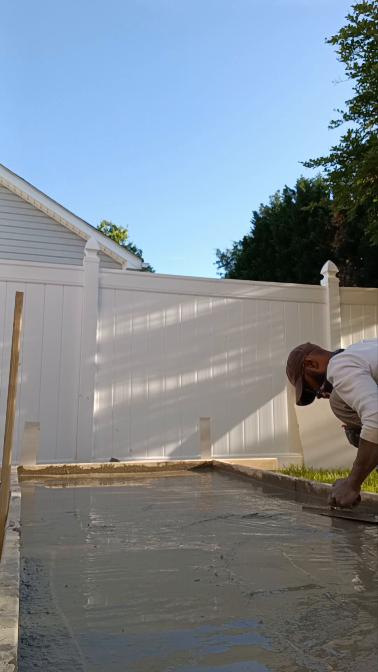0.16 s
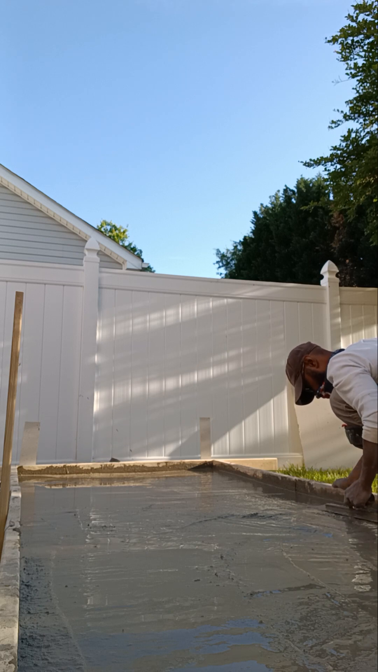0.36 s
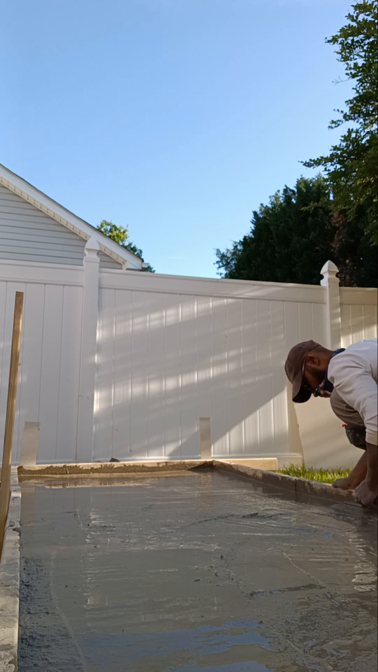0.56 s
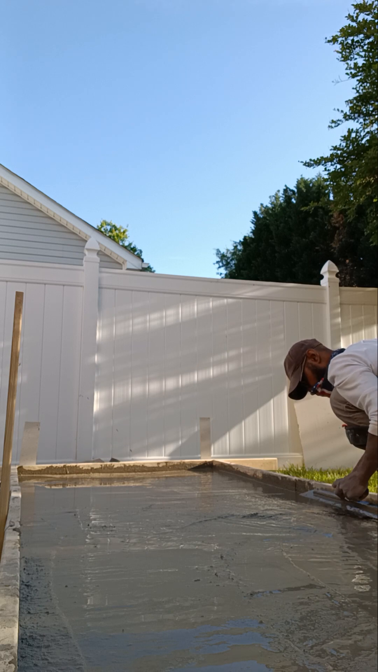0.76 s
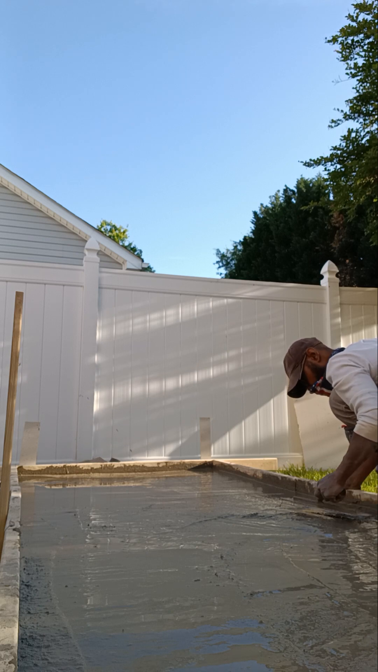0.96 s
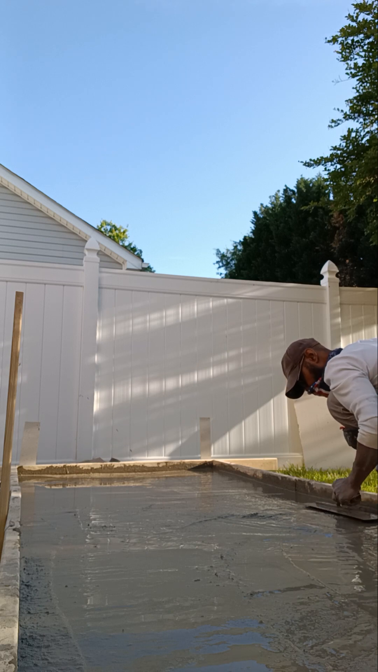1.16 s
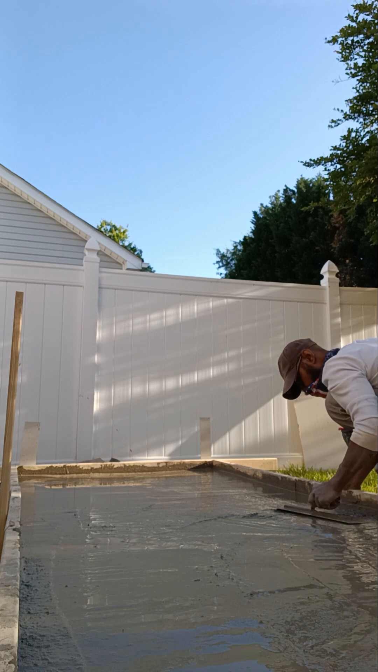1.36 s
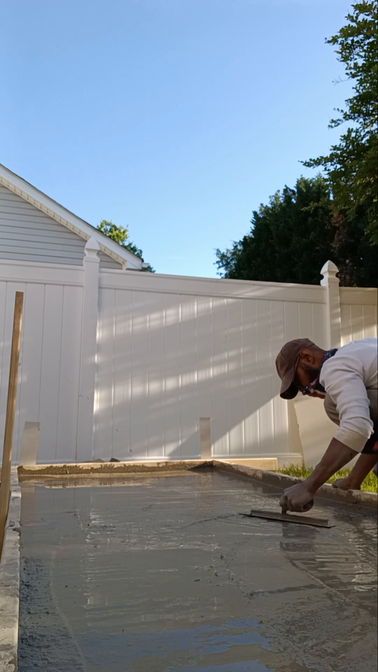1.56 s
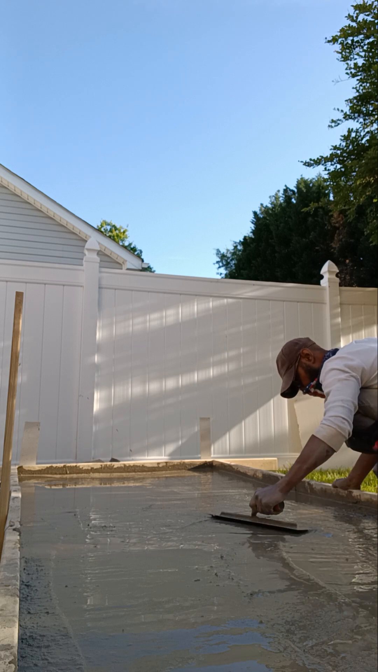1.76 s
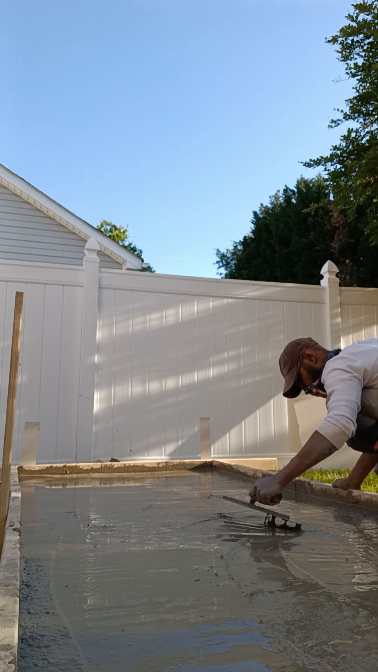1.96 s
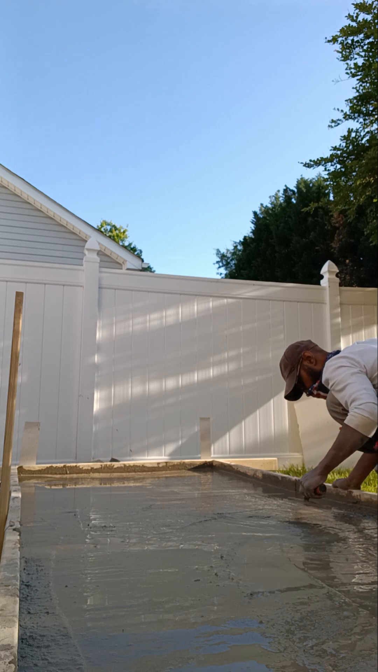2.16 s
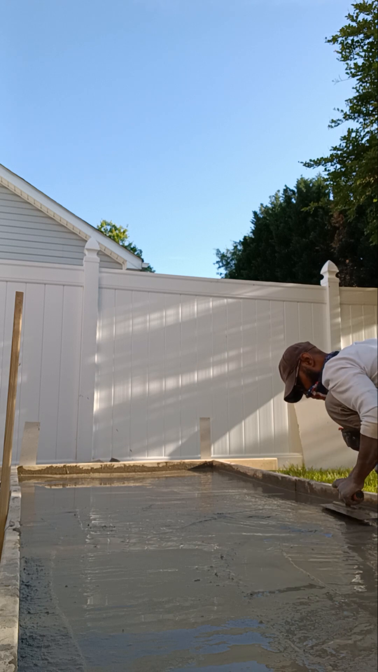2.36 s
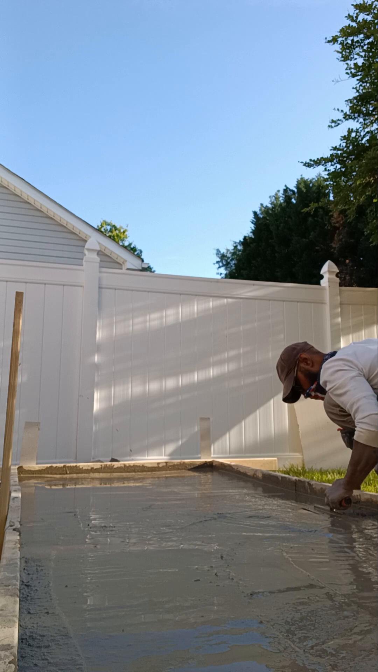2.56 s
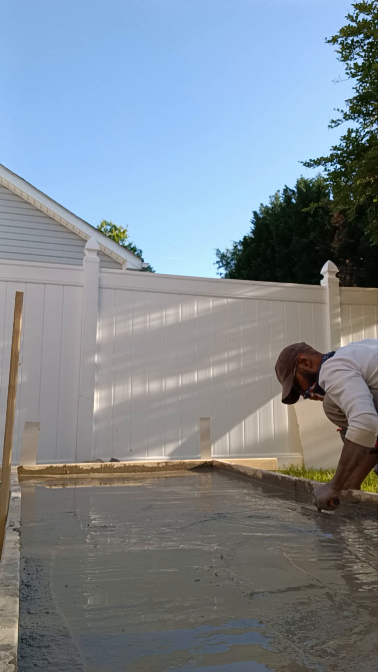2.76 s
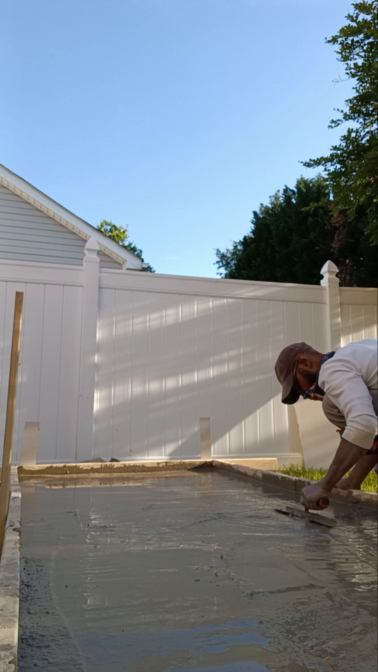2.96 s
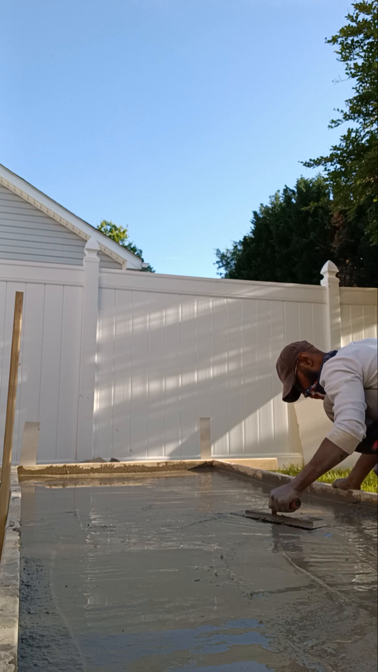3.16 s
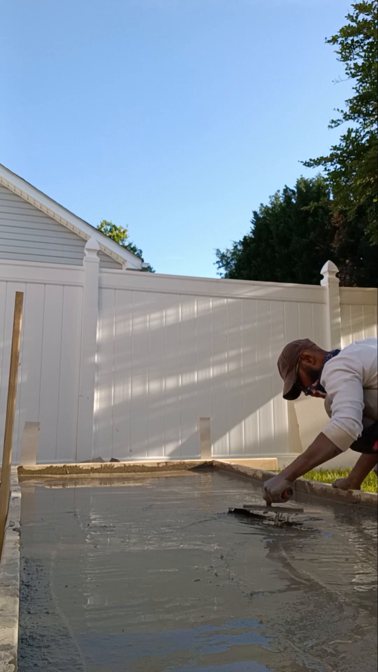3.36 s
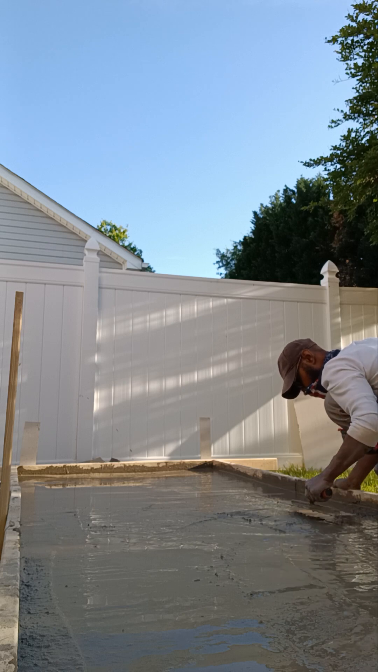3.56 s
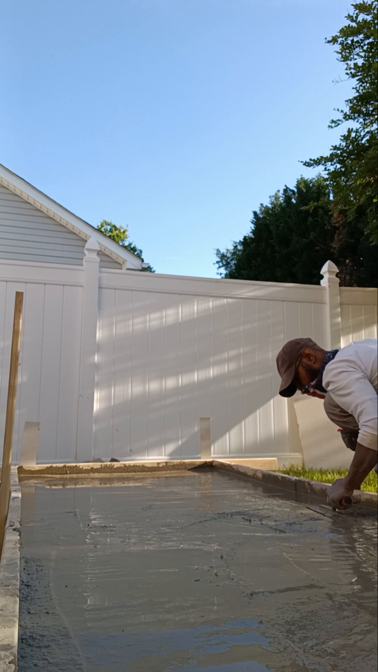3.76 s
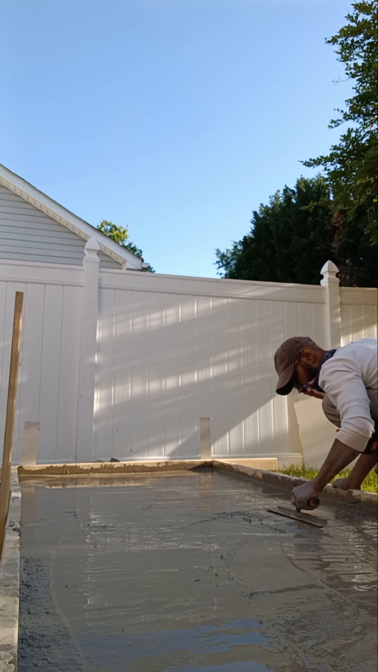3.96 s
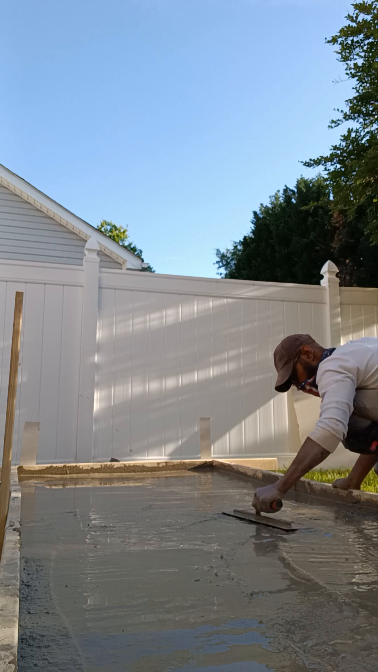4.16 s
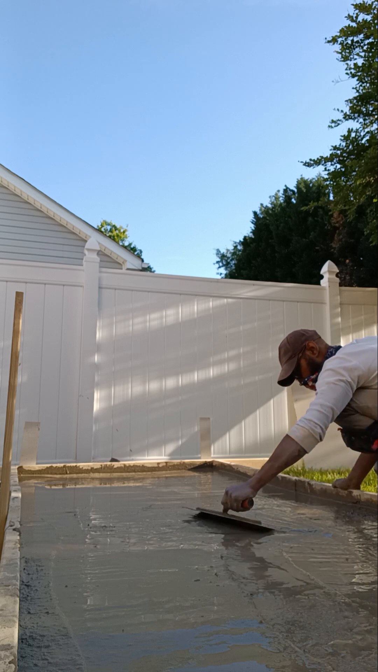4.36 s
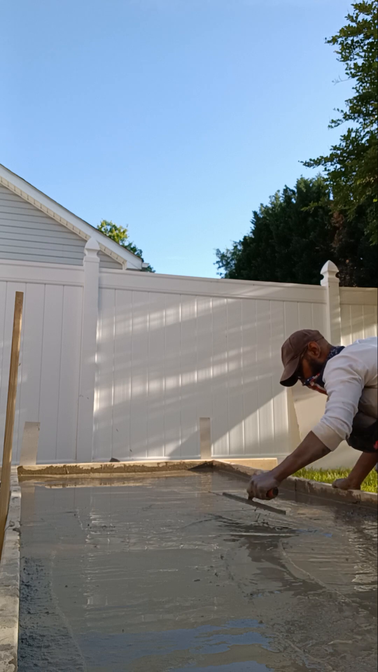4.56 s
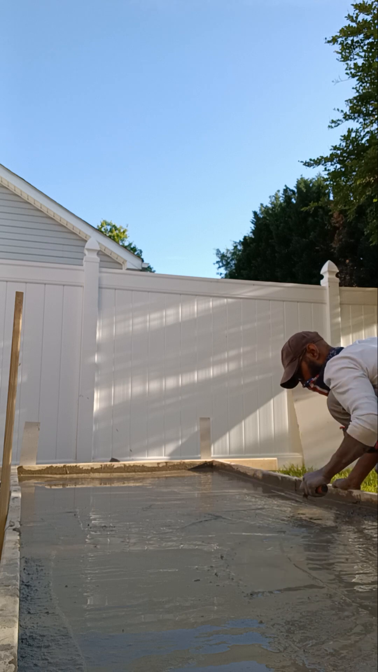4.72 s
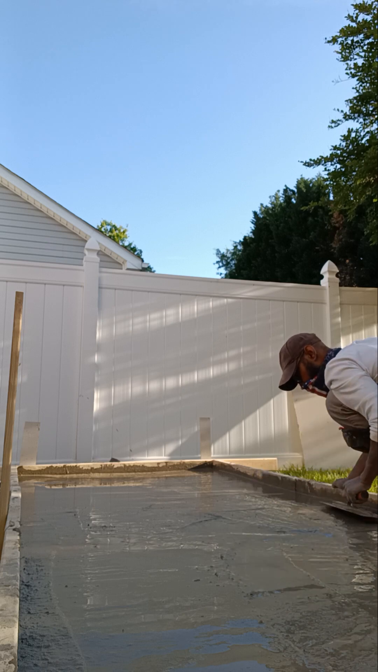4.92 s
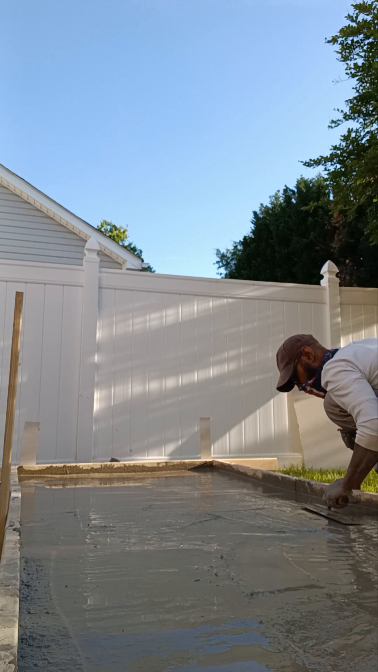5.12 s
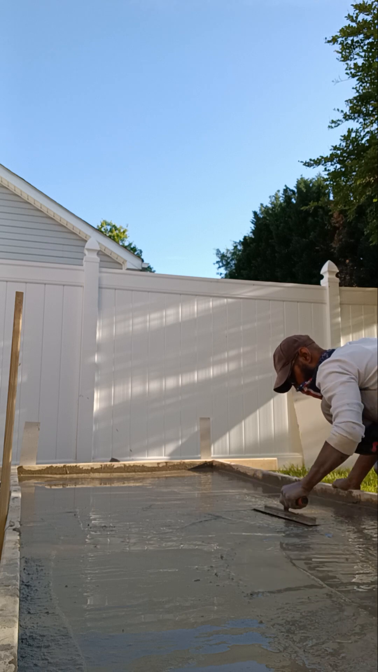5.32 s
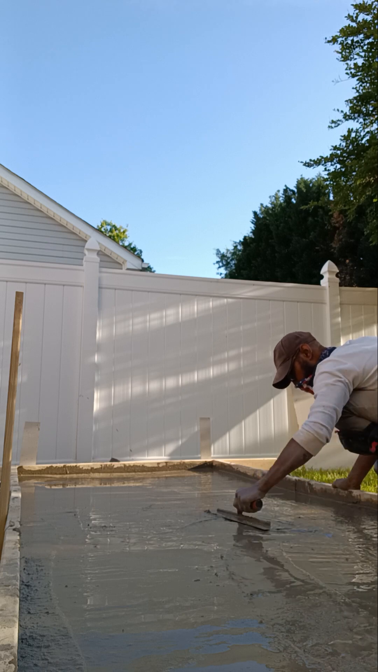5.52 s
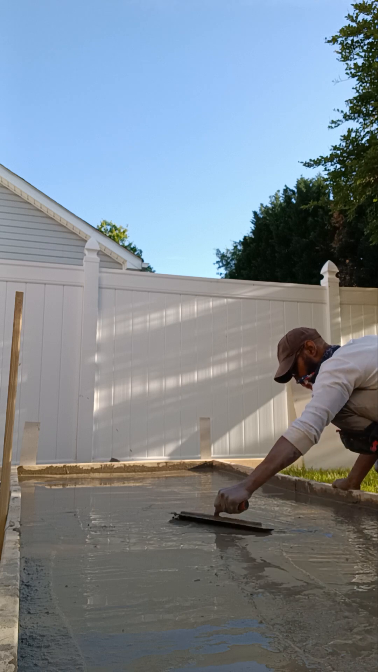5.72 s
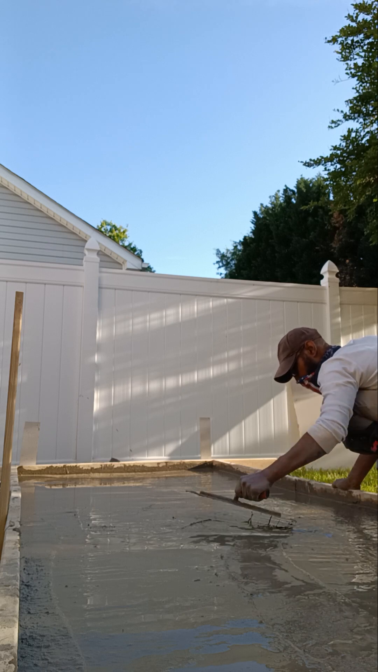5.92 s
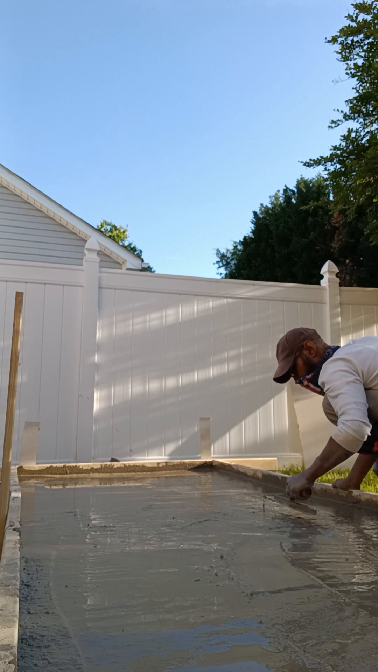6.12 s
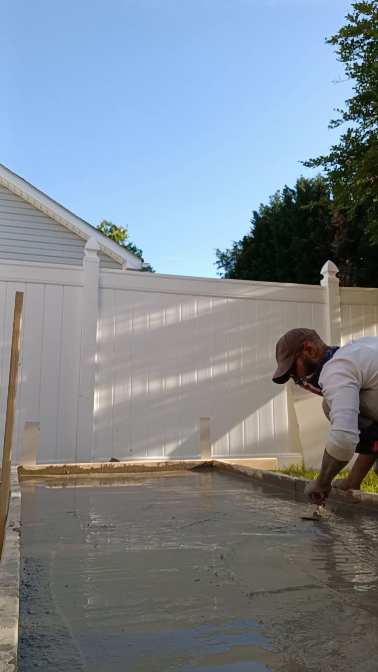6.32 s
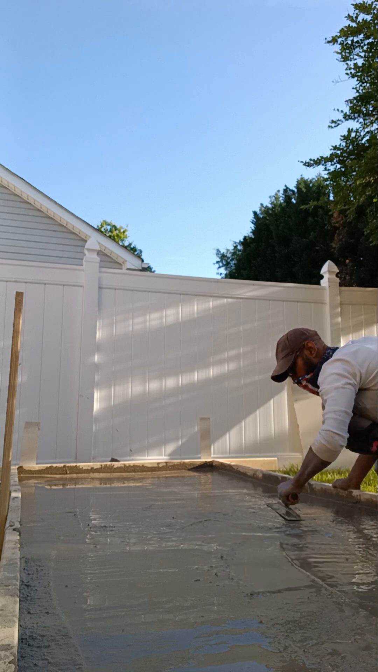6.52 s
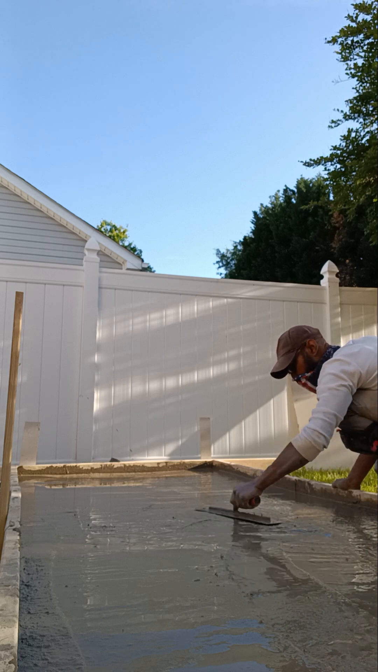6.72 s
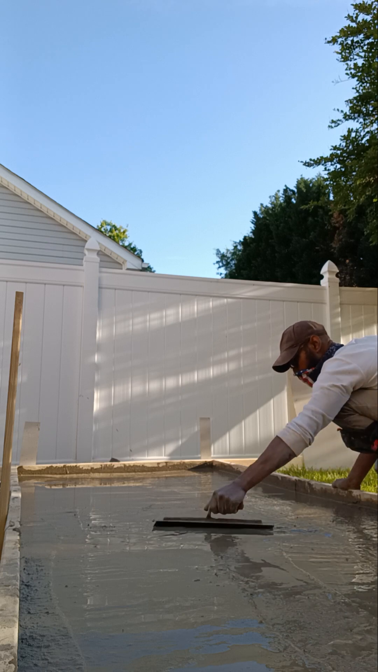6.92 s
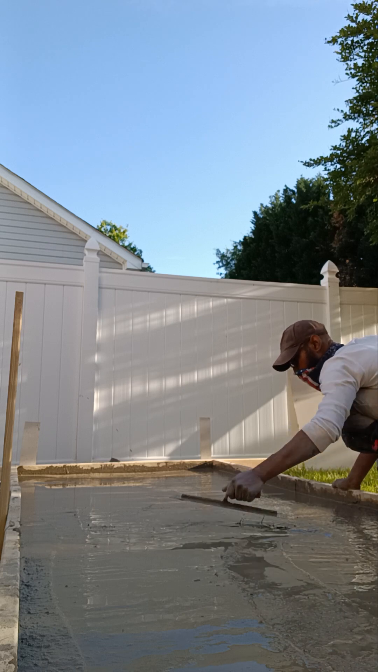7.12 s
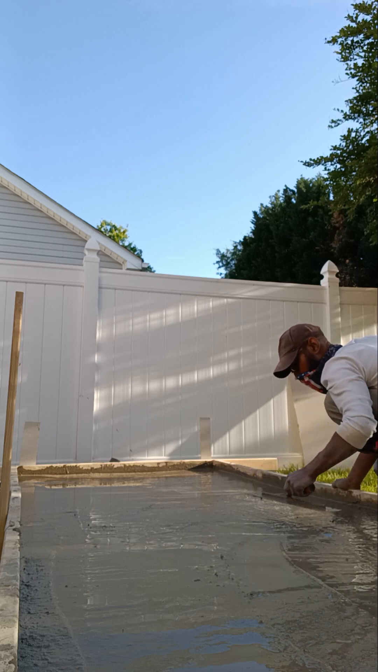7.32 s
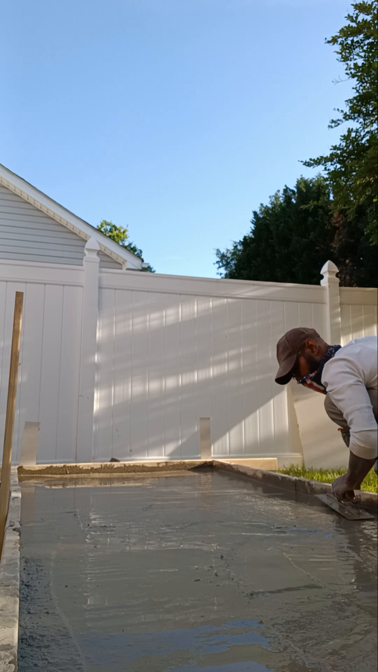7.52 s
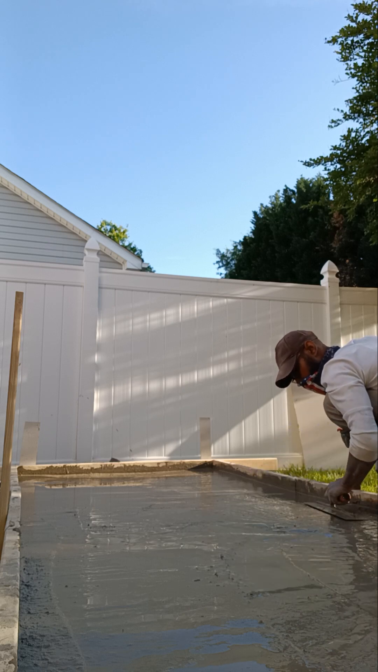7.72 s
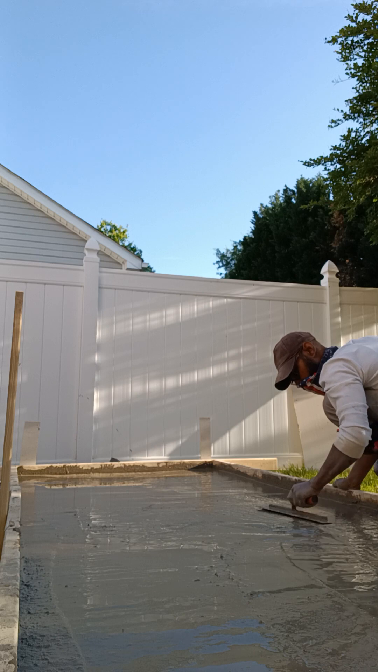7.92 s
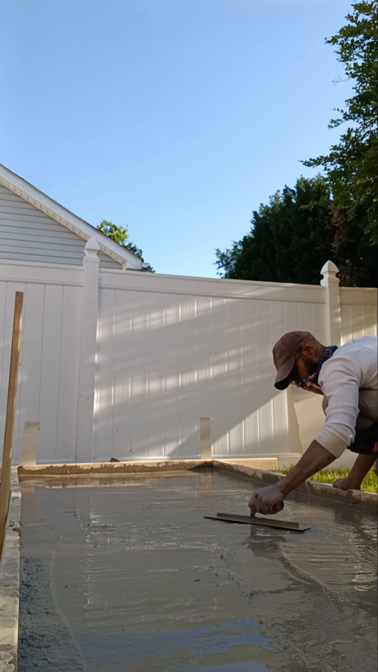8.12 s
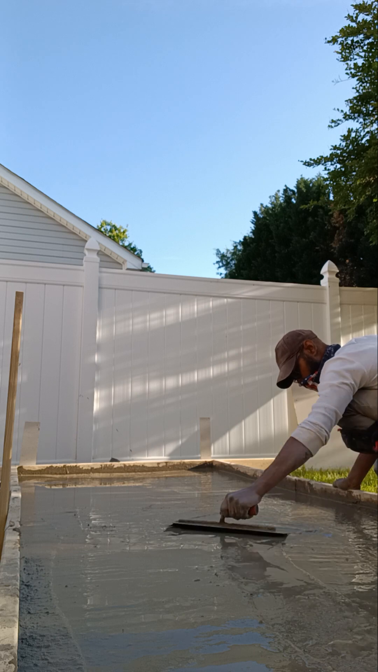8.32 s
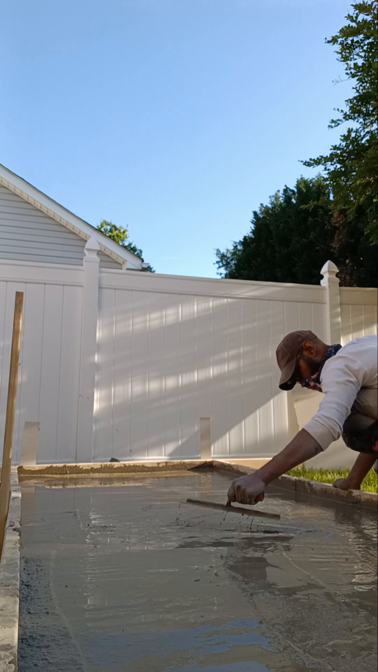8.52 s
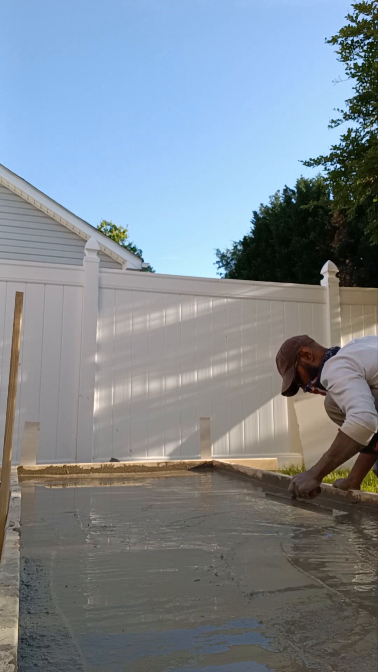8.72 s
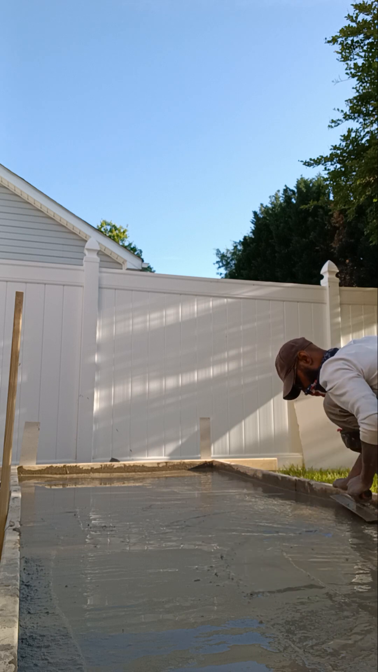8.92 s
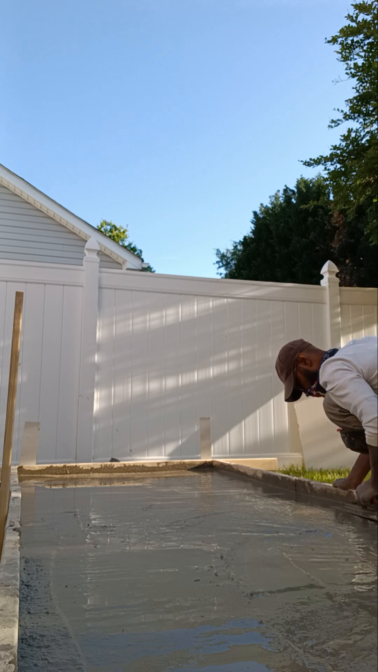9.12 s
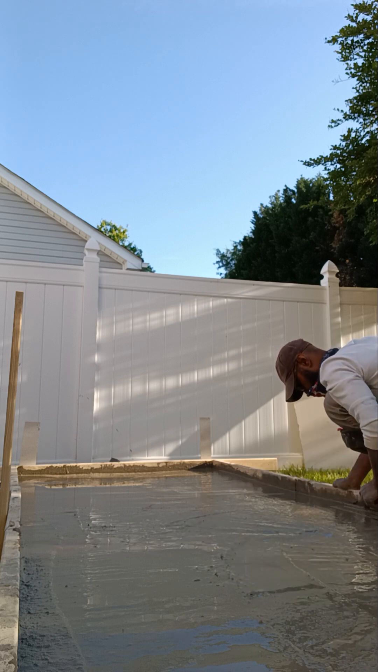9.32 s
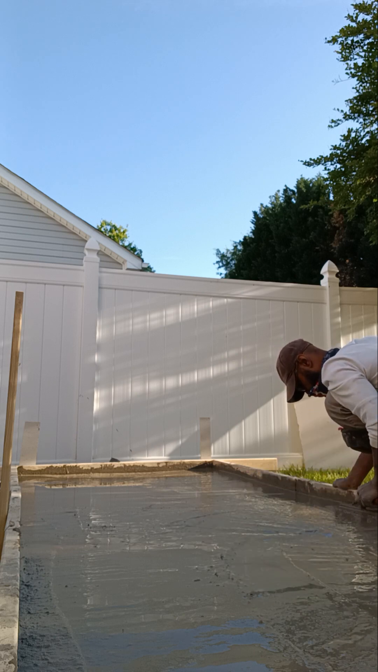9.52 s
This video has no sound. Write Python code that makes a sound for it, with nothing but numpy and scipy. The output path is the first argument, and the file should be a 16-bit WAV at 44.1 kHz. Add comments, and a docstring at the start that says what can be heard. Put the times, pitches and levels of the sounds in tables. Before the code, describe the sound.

Close outdoor sound of a steel trowel sweeping wet concrete in a backyard. Eight gritty, hissing strokes come a little over a second apart, each ending abruptly with a faintly metallic lift. Some stronger strokes crunch over pebbles, and one has a wet squelch. A wooden form is knocked near the start and near the end. Far-off bird whistles and a low, quiet rumble sit behind, with a short fence echo.

```python
"""In a fenced backyard, a steel hand trowel is swept in arcs over a wet concrete slab.
In each stroke the blade lands on its edge, flattens, pushes through wet paste and tilts up again before it lifts:
pressure drives the grinding sand as random impacts, and tilt frees the damped resonance of the blade.
Now and then the wooden form is knocked and rings in decaying modes. A bird whistles in gliding tones far off,
over a soft boom and low outdoor noise; fence and house give a short, diffuse echo."""
import sys
import numpy as np
from scipy import signal
from scipy.fft import rfft, irfft, next_fast_len
from scipy.io import wavfile
from scipy.ndimage import uniform_filter1d, map_coordinates

SR = 44100
rng = np.random.default_rng(int(sys.argv[2]) if len(sys.argv) > 2 else 0)


def materialize(psi):
    """Save the field psi as 16-bit PCM at rate SR to the path in sys.argv[1].

    A 1-D psi becomes a single channel; in a 2-D psi each row is a channel.
    """
    bounded = np.clip(np.atleast_2d(psi).T, -1, 1)
    quanta = np.round(bounded * 32767).astype(np.int16)
    wavfile.write(sys.argv[1], SR, quanta)


N = 422478

# Spectrum of fine sand under steel. Each row: frequency in Hz, relative level in dB.
SAND_SPECTRUM = [(2500, -38), (5500, -11), (7000, -3.5), (8400, 2), (10100, 2.5), (11400, -6), (13500, -9),
                 (16000, -14)]
# Spectrum of coarser grains. Each row: frequency in Hz, relative level in dB.
GRIT_SPECTRUM = [(300, -41), (900, -25.5), (1900, -3), (2350, -8.5), (3100, -1.5), (3750, -2), (4300, 1.5),
                 (5500, 2.5), (6500, -2), (8000, -17), (16000, -44)]
EDGE_HZ = 1460  # nominal pitch of the blade on its edge


def amp(db):
    """Decibels to amplitude gain: 20 dB is a factor of ten."""
    return 10 ** (np.asarray(db) / 20)


def unit(x):
    """Normalisation: x scaled to an rms of 1."""
    return x / np.sqrt(np.mean(x ** 2) + 1e-20)


def along(points, hz):
    """Interpolation of (Hz, value) points on a logarithmic frequency axis."""
    f, v = np.transpose(points)
    return np.interp(np.log(hz + 1), np.log(f + 1), v)


def wobble(rate):
    """Slow random modulation: a spline through random knots, rate of them a second."""
    knots = rng.standard_normal(int(N * rate / SR) + 4)
    return map_coordinates(knots, [np.arange(N) * rate / SR])


def filtered(x, response):
    """Linear filtering: the spectrum of x is multiplied by a complex response of frequency."""
    size = next_fast_len(x.shape[-1] + 8192)
    spectrum = rfft(x, size) * response(np.fft.rfftfreq(size, 1 / SR))
    return irfft(spectrum, size)[..., :x.shape[-1]]


def coloured(x, spectrum):
    """Spectral shaping: x is filtered by (Hz, dB) points, then scaled to rms 1."""
    return unit(filtered(x, lambda hz: amp(along(spectrum, hz))))


def add(track, s, sound):
    """Superposition: a sound is summed into a track at time s in seconds."""
    start = max(0, round(s * SR))
    part = track[..., start:start + sound.shape[-1]]
    part += sound[..., :part.shape[-1]]


def stroke(t, pressure, tilt_s, wettest_s, grit_db, ring_db, squelch_db, flat_hz):
    """Contact excitation: pressure drives all layers, tilt frees the ring and shifts its pitch, wetness squelches."""
    normal_db, hiss_db = -29, -3.5  # an ordinary pressure; fine hiss relative to the pressure
    land_db_per_s, lift_db_per_s = 1502, 522  # contact builds up, and breaks off
    cling_db, cling_db_per_s = -21, 190  # paste clings to the lifted blade for a moment
    landing_tilt, flatten_s = 0.69, 0.14  # tilt runs from 0 (flat) to 1 (on its edge)
    flat_damping_db, ring_follows = 13.5, 0.88  # loss of the ring when flat; ring dB per dB of pressure
    wet_span_s, dry_db, squelch_follows = .28, 17, 0.49  # reach of the wet spot; loss far from it; dB per dB

    times, levels = np.transpose(pressure)
    level_db = np.interp(t, times, levels)
    push_db = level_db - normal_db
    since, lifted = t - times[0], np.maximum(t - times[-1], 0)
    landing_db = land_db_per_s * np.minimum(since, 0)
    leaving_db = np.maximum(-lift_db_per_s * lifted, cling_db - cling_db_per_s * lifted)
    contact_db = landing_db + leaving_db

    rising = np.clip((t - tilt_s) / max(times[-1] - tilt_s, .01), 0, 1)
    tilt = np.minimum(landing_tilt * np.exp(-(since / flatten_s) ** 2) + rising, 1)
    ring = normal_db + ring_db + ring_follows * push_db - flat_damping_db * (1 - tilt)
    wet = np.exp(-((t - wettest_s) / wet_span_s) ** 2)
    squelch = squelch_db + squelch_follows * push_db - dry_db * (1 - wet)
    gains = amp(contact_db + np.array([level_db + hiss_db, level_db + grit_db, ring, squelch]))
    return *gains, tilt, flat_hz + (EDGE_HZ - flat_hz) * tilt


def stroke_controls():
    """Amplitude and pitch envelopes: hiss, grit, ring and squelch gains, tilt and ring pitch of all strokes."""
    # Differences between strokes. Each row: start of tilting up in seconds, wettest moment in seconds,
    # offsets of grit and ring in dB, squelch in dB at ordinary pressure, nominal pitch of the flat blade in Hz.
    stroke_rows = [ (0.05, 0.67, -4, -1.5, -51.5, 1952), (1.36, 1.65, -3, 0.5, -45, 1620),
                   (2.78, 2.83, -1.5, -3.5, -35, 1300), (3.95, 4.1, -4, -4, -44, 1750),
                   (5.3, 5.36, -5, -2, -43, 1820), (6.62, 6.59, -5.5, -2.5, -46.5, 1752),
                   (7.86, 8.1, -6, -2, -45, 1850), (9.301, 9.5, -0.5, -3.5, -44, 1400)]
    # Pressure on the blade, one curve per stroke from landing to lift.
    # Each row of a curve: time in seconds, level that drives the scrape in dB.
    pressure_curves = [
        [(0.0, -61), (0.018, -60.5), (0.134, -40), (0.268, -28.5), (0.322, -27.5), (0.376, -29.5),
         (0.442, -28.5), (0.498, -33), (0.5, -39.5)],
        [(1.142, -38), (1.148, -32.5), (1.19, -37.5), (1.236, -27.5), (1.248, -33), (1.506, -33.5),
         (1.546, -26.5), (1.768, -26), (1.785, -31.5)],
        [(2.36, -44.5), (2.364, -35.5), (2.472, -42), (2.516, -38.5), (2.78, -39.5), (3.052, -23),
         (3.062, -26.5), (3.128, -23), (3.175, -33)],
        [(3.66, -43.5), (3.728, -37.5), (3.824, -27.5), (3.882, -28), (3.912, -26.5), (3.998, -29.5),
         (4.21, -16.5), (4.216, -20), (4.305, -28.5)],
        [(4.882, -52), (4.898, -42), (4.928, -31.5), (5.124, -25.5), (5.184, -30.5), (5.414, -24),
         (5.658, -28.5), (5.67, -24), (5.685, -32)],
        [(6.2, -49), (6.278, -36.5), (6.352, -38.5), (6.372, -36.5), (6.526, -28), (6.718, -24.5), (6.822, -27),
         (6.862, -24), (6.89, -29)],
        [(7.495, -55), (7.505, -37), (7.571, -49), (7.611, -29), (7.631, -40.5), (7.729, -31), (8.089, -18.5),
         (8.265, -23.5), (8.31, -31)],
        [(9.16, -68), (9.194, -72), (9.224, -48.5), (9.32, -42.5), (9.338, -57), (9.412, -54.5), (9.48, -40.5),
         (9.56, -47), (9.58, -43)],
    ]
    wander_hz = 100  # scale of the pitch bends from the unsteady hand
    t, controls = np.arange(N) / SR, np.zeros((6, N))
    controls[-1] = EDGE_HZ
    for pressure, row in zip(pressure_curves, stroke_rows):
        near = (t > pressure[0][0] - .05) & (t < pressure[-1][0] + .3)
        controls[:, near] = stroke(t[near], pressure, *row)
    controls[-1] += wander_hz * wobble(14)
    return controls


def grains(rate, size_db, spread_s):
    """Random impacts: stereo impulses whose port delay varies with their spot along the blade."""
    count = int(rate * N / SR)
    draws = rng.standard_normal((count, 3))
    when = rng.integers(0, N, count)
    size = np.sign(draws[:, 0]) * amp(size_db * draws[:, 1])
    delay = np.round(spread_s * SR * draws[:, 2]).astype(int)
    left = np.clip(when + delay, 0, N - 1)
    return np.array([np.bincount(left, size, N), np.bincount(when, size, N)])


def patchy(x, depth_db, size_bins=5, size_frames=12):
    """Time-frequency modulation: narrow bands swell and fade at random, alike in both channels."""
    z = signal.stft(x, nperseg=512)[2]
    field = uniform_filter1d(rng.standard_normal(z.shape[1:]), size_bins, 0)
    field = uniform_filter1d(field, size_frames, 1)
    return signal.istft(z * amp(depth_db * unit(field)), nperseg=512)[1][:, :N]


def squeaks(rate, life_s, size_db):
    """Stick-slip friction: single grains catch under the steel, each a tiny ring at its own pitch."""
    count = int(rate * N / SR)
    draws, t = rng.random((count, 5)), np.arange(SR // 40) / SR
    hz = 2400 * (11000 / 2400) ** draws[:, :1]
    u = t / (life_s * (.5 + draws[:, 1:2]))
    swell = amp(size_db * draws[:, 2:3]) * u * np.exp(-u) * (1 - t / t[-1])
    where = (draws[:, 3:4] * N).astype(int) + np.arange(len(t))
    channels = []
    # the spot along the blade sets the phase between the ports
    for phase in (0, 3 * (draws[:, 4:] - .5)):
        rings = swell * np.sin(2 * np.pi * hz * t + phase)
        channels.append(np.bincount(where.ravel(), rings.ravel(), N)[:N])
    return unit(np.array(channels))


def sand(judder, hiss, grit):
    """Granular friction: fine sand hisses and coarser grains crack and squeak, in shared clumps."""
    clumps = amp(1.1 * judder + 0.92 * wobble(260))
    fine = patchy(grains(rate=22000, size_db=4.2, spread_s=.000018) * clumps, depth_db=2.7)
    coarse = patchy(grains(rate=14000, size_db=4.2, spread_s=.00006) * clumps, depth_db=3.3, size_bins=4)
    squeaking = amp(-9) * squeaks(rate=420, life_s=.002, size_db=20)
    hissing = amp(-0.74) * hiss * coloured(fine, SAND_SPECTRUM)
    cracking = amp(-0.7) * coloured(coarse, GRIT_SPECTRUM)
    return hissing + grit * (cracking + squeaking)


def blade(judder, pitch_hz, width_hz, core_hz, core_db):
    """Driven resonance: grains excite a broad peak and a narrow core that move as the blade tilts off the paste."""
    drive = grains(rate=2500, size_db=4.0, spread_s=.00013) * amp(2 * judder)
    hz, _, z = signal.stft(patchy(drive, depth_db=4.0, size_bins=2), SR, nperseg=512)
    centre = pitch_hz[np.minimum(np.arange(z.shape[-1]) * 256, N - 1)]  # one pitch per frame
    detune = (hz[:, None] ** 2 - centre ** 2) / (hz[:, None] + 1)
    broad = 1 / (1 + (detune / width_hz) ** 2)
    core = amp(core_db) / (1 + (detune / core_hz) ** 2)
    return unit(signal.istft(z * (broad + core), nperseg=512)[1][:, :N])


def paste(judder, squelch, tilt):
    """Cavity popping: pressed cement paste opens wet pockets, larger and deeper under a flat, hard-pressed blade."""
    # Small pockets. Each row: frequency in Hz, relative level in dB.
    small_spectrum = [(150, -27), (330, -31.5), (480, -10), (700, 2), (900, 3), (1200, -12), (2000, -26),
                      (5000, -50.5)]
    # Large pockets. Each row: frequency in Hz, relative level in dB.
    large_spectrum = [(150, -35.5), (280, -10.5), (400, -9.5), (540, 1.5), (700, -1.5), (1000, -16.5),
                      (3000, -58.5)]
    small = grains(rate=700, size_db=6.5, spread_s=.00004) * amp(1.1 * judder)
    large = grains(rate=260, size_db=5.5, spread_s=.00004) * amp(2.7 * judder)
    depth = (squelch / squelch.max()) ** 0.45 * amp(-5.5 - 11 * tilt)
    popping = coloured(patchy(small, depth_db=4.0, size_bins=2), small_spectrum)
    return squelch * (popping + depth * coloured(large, large_spectrum))


def catches():
    """Impact excitation: landing or dragging a pebble gives a gritty burst and jolts the blade into a clang."""
    # Landings and caught pebbles. Each row: start in seconds, relative levels of crunch and clang in dB.
    catch_rows = [(0.4356, -14.5, -21.5), (1.1382, -22, -33), (2.362, -20.5, -40.5), (3.662, -20, -47),
                  (3.8148, -13.5, -39.5), (4.1512, -6.5, -19), (4.1713, -6.5, -23), (4.204, -5, -23),
                  (4.8815, -23.5, -41), (5.2689, -13.5, -42), (6.1759, -40, -52), (6.204, -29, -42.5),
                  (6.2634, -19.5, -29), (6.7094, -11.5, -33), (7.028, -39.5, -65), (7.4898, -28, -47.5),
                  (7.6101, -23.5, -44), (7.8915, -14.5, -41.5), (7.9254, -8.5, -32), (8.063, -5.5, -21.5),
                  (8.0945, -8, -23), (8.4113, -34.5, -57), (9.0261, -31, -54), (9.0393, -23, -52.5),
                  (9.3162, -28.5, -40), (9.3846, -46, -42), (9.468, -27, -44)]
    # Spectrum of the jolted blade. Each row: frequency in Hz, relative level in dB.
    clang_spectrum = [(700, -31.5), (1200, -6.5), (1480, 1), (1800, -4.5), (2600, -20), (6000, -45.5)]
    crunch_t60_s, clang_t60_s = .047, .11
    track, t = np.zeros((2, N)), np.arange(SR // 8) / SR
    for s, crunch_db, clang_db in catch_rows:
        noise = rng.standard_normal(len(t)) + rng.standard_normal((2, len(t)))  # shared part + one per port
        crush = noise * amp(3 * rng.standard_normal(len(t)))
        burst = unit(coloured(crush, SAND_SPECTRUM) + 0.93 * coloured(crush, GRIT_SPECTRUM))
        burst = burst * amp(crunch_db - 7.5 - 60 * t / crunch_t60_s)
        clang = coloured(rng.standard_normal(len(t)), clang_spectrum)
        clang = clang * amp(clang_db - 1 - 60 * t / clang_t60_s)
        add(track, s, (1 - np.exp(-t / 0.00058)) * (burst + clang))
    return track


def knocks():
    """Modal vibration: each blow rings the decaying modes of the board, with a faint noisy crack on top."""
    # Blows on the wooden form. Each row: start in seconds, relative level in dB.
    knock_rows = [(0.4924, -14.5), (7.528, -36.5), (8.87, -12.5), (9.048, -33), (9.229, -46), (9.319, -41)]
    # Modes of the form board. Each row: frequency in Hz, mean relative level in dB, 60 dB decay time in seconds.
    board_modes = [(133.5, -28.5, 0.39), (179, -11, 0.081), (284, -23.5, 0.24), (406, 1, 0.045),
                   (461, 5, 0.023), (770, -13, 0.062), (950, -13, 0.032), (1170, -16, 0.019),
                   (1430, -28, 0.12), (1650, -20, 0.035)]
    # Spectrum of the crack. Each row: frequency in Hz, relative level in dB.
    crack_spectrum = [(500, 2), (2000, -7.5), (3500, -16.5), (9000, -13), (13000, -17.5)]
    track, t = np.zeros(N), np.arange(SR // 3) / SR
    for s, db in knock_rows:
        ring = np.zeros(len(t))
        for hz, level, t60 in board_modes:
            ring += amp(level + rng.normal(0, 1) - 60 * t / t60) * np.sin(2 * np.pi * hz * t)
        crack = amp(-24.0 - 60 * t / 0.1) * coloured(rng.standard_normal(len(t)), crack_spectrum)
        add(track, s, amp(db) * (ring + crack) * (1 - np.exp(-t / 0.0013)))
    return track


def bird():
    """Frequency modulation: slurred, fluttering whistles glide in pitch while they swell and fade."""
    # Whistles. Each row: start in seconds, length in seconds, nominal start and end pitch in Hz, relative level in dB.
    whistle_rows = [(0.598, 0.1, 3110, 3440, -53.5), (0.665, 0.15, 2370, 2560, -58),
                    (1.029, 0.22, 3140, 3430, -56.5), (1.845, 0.089, 3150, 3380, -53.5),
                    (1.894, 0.12, 2380, 2690, -57), (3.252, 0.067, 3250, 2800, -51.5),
                    (3.3, 0.14, 2266, 2170, -52.5), (4.387, 0.069, 3040, 3100, -56.5),
                    (4.435, 0.062, 2420, 1900, -57.5), (4.527, 0.073, 3170, 3230, -55.5),
                    (4.577, 0.067, 2570, 1900, -57.5), (5.77, 0.04, 2840, 2740, -54),
                    (6.166, 0.13, 3020, 3040, -55)]
    arch_hz = 25  # upward bend in the middle of every whistle
    track = np.zeros(N)
    for s, length, start_hz, end_hz, db in whistle_rows:
        u = np.linspace(0, 1, int(length * SR))
        swell = np.sin(np.pi * u)
        pitch = start_hz + (end_hz - start_hz) * u + arch_hz * swell
        flutter = unit(uniform_filter1d(rng.standard_normal(len(u)), size=90))
        pitch = pitch * (1 + .024 * flutter)
        add(track, s, amp(db) * swell * np.sin(2 * np.pi * np.cumsum(pitch) / SR))
    return track * amp(2.7 * wobble(120))


def yard(x):
    """Diffuse reverberation: fence and house answer with decaying noise, different at each port."""
    # Decay of the echo. Each row: frequency in Hz, 60 dB decay time in seconds.
    decay_times = [(150, 0.24), (600, 0.19), (2000, 0.38), (6000, 0.3), (14000, 0.18)]
    hz, t, z = signal.stft(rng.standard_normal((2, SR // 2)), SR, nperseg=256)
    decay = amp(-60 * t / along(decay_times, hz)[:, None])
    tail = signal.istft(z * decay * (1 - np.exp(-t / 0.0061)), SR, nperseg=256)[1]
    return signal.fftconvolve(np.atleast_2d(x), tail / np.linalg.norm(tail[0]), axes=1)[:, :N]


def boom():
    """Additive synthesis: low tones that swell and die sum to a soft, very low boom."""
    # Tones. Each row: start in seconds, frequency in Hz, relative level in dB, swell time in seconds.
    boom_tones = [(3.19, 76, -33.5, 0.028), (3.175, 133, -40.5, 0.031), (3.28, 46, -42, 0.07)]
    track, t = np.zeros(N), np.arange(SR // 2) / SR
    for s, hz, db, swell in boom_tones:
        envelope = t / swell * np.exp(1 - t / swell)
        add(track, s, amp(db) * envelope * np.sin(2 * np.pi * hz * t))
    return track * amp(2.3 * wobble(40))


def outdoors():
    """Filtered noise: a lumpy low rumble, partly coherent between the ports, under a faint drifting hiss."""
    # Slow drift of the rumble. Each row: time in seconds, relative level in dB.
    rumble_drift = [(0, -58.2), (0.7, -60.5), (1.3, -57.2), (2.0, -62.1), (2.7, -65.6), (3.7, -58.3),
                    (4.6, -66.1), (5.7, -69.0), (6.6, -65.9), (7.1, -70.8), (7.7, -57.7), (8.5, -62.8),
                    (9.58, -65.3)]
    # Spectrum of the rumble. Each row: frequency in Hz, relative level in dB.
    rumble_spectrum = [(13, -38), (22, -11.5), (47, -3), (65, 3), (123, -5.5), (152, -11), (193, -17.5),
                       (232, -9.5), (246, -13), (285, -25), (325, -30.5), (359, -31), (381, -43),
                       (400, -35.5), (520, -67), (880, -120)]
    # Spectrum of the hiss. Each row: frequency in Hz, relative level in dB.
    air_spectrum = [(150, -16.5), (300, -5.5), (500, -13), (1300, -15), (2000, -20.5), (4000, -19.5),
                    (8000, -24), (11000, -25), (12500, -40), (16000, -46)]
    level_db = np.interp(np.arange(N) / SR, *np.transpose(rumble_drift))
    noise = rng.standard_normal(N) + 0.49 * rng.standard_normal((2, N))
    rumble = coloured(noise, rumble_spectrum) * amp(level_db + 4.0 + 3.7 * wobble(21))
    air = coloured(patchy(rng.standard_normal((2, N)), depth_db=1.5, size_frames=30), air_spectrum)
    return rumble + amp(-71.5 + 1.7 * wobble(2.6)) * air


def ports(x):
    """Minimum-phase filtering: the two microphone ports have opposite, causal resonances."""
    # Unequal hearing of the slab. Each row: frequency in Hz, left minus right gain in dB.
    port_difference = [(850, 1), (1150, -6.5), (1400, -6.5), (1750, -1.5), (2300, 10), (3600, -0.5),
                       (4500, 1.5), (5600, 2.5), (7200, 8), (8400, 10.5), (9900, -8), (11000, -9.5),
                       (12300, 1.5), (15500, -4)]
    size = 1024
    difference_db = along(port_difference, np.fft.rfftfreq(size, 1 / SR))
    log_gain = np.log(amp(difference_db)) * np.array([[.5], [-.5]])
    # folding the cepstrum onto positive times makes the response causal
    cepstrum = irfft(log_gain)[:, :size // 2]
    cepstrum[:, 1:] *= 2
    return signal.fftconvolve(x, irfft(np.exp(rfft(cepstrum, size))), axes=1)[:, :N]


def scene():
    """Interaural-style delay and reverberant mix: the trowel works to the right, the bird among its echoes."""
    lag_s = .00079  # the left port hears the trowel later than the right
    hiss, grit, ring, squelch, tilt, pitch_hz = stroke_controls()
    judder = wobble(55)  # the blade grips and slips unevenly
    steel = amp(.7) * ring * blade(judder, pitch_hz, width_hz=1050, core_hz=300, core_db=-5)
    trowel = amp(2.5) * sand(judder, hiss, grit) + steel + amp(2.17) * paste(judder, squelch, tilt)
    work = trowel + catches() + knocks()
    # half the lag delays the left port, half advances the right
    direct = filtered(work, lambda hz: np.exp(-1j * np.pi * hz * lag_s * np.array([[1], [-1]])))
    slab = ports(direct + amp(-14.5) * yard(work))
    song = bird()
    return slab + amp(2) * song + amp(-8) * yard(song) + boom() + outdoors()


def record(dry):
    """Soft saturation and band limiting: the highest peaks are rounded and the top of the treble is cut."""
    top_hz = 15900  # middle of a 400 Hz wide slope
    rounded = dry / (1 + (dry / .8) ** 6) ** (1 / 6)
    return filtered(rounded, lambda hz: np.clip((top_hz - hz) / 400 + .5, 0, 1) ** 2)


dry = scene()
out = record(dry)
materialize(out)
```